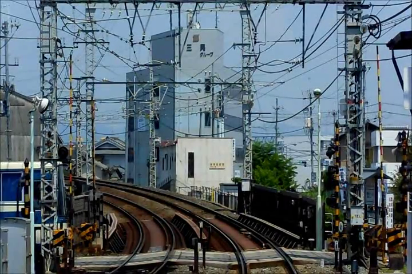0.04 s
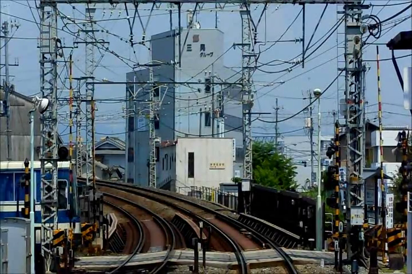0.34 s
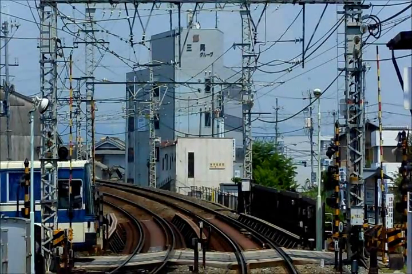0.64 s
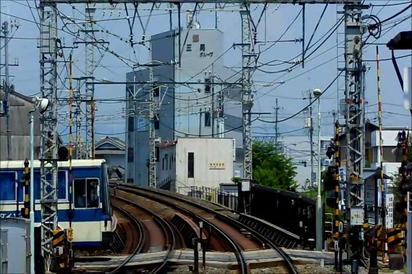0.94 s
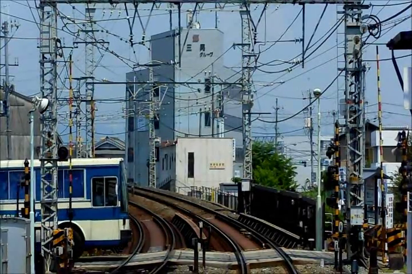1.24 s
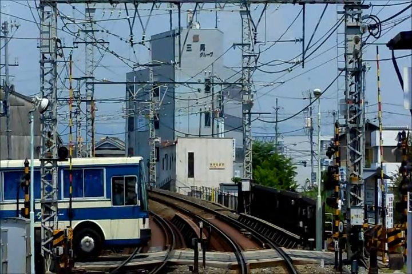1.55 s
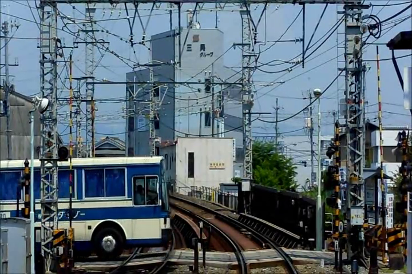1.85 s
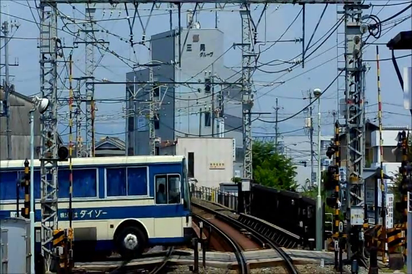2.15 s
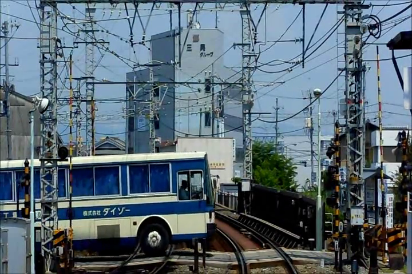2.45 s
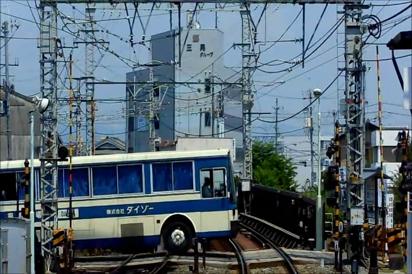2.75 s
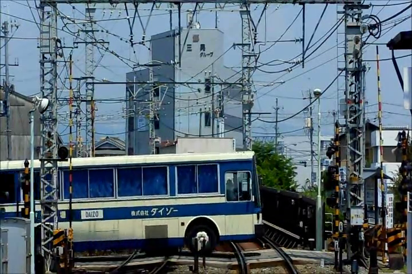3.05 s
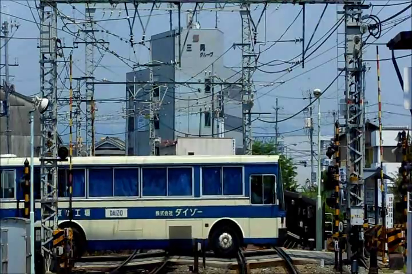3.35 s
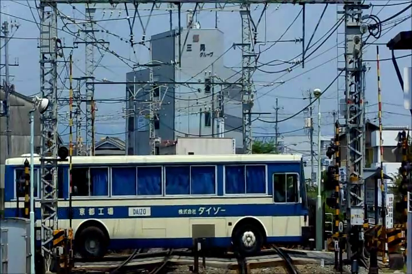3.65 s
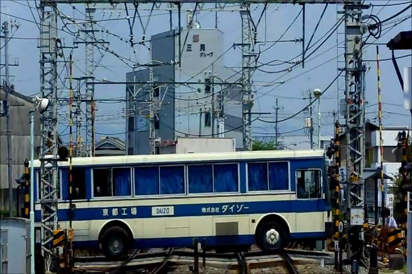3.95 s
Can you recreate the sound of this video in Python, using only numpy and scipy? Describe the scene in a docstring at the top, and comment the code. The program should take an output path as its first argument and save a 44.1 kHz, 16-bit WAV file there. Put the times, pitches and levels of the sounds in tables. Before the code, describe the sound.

A diesel bus throbs, drops at a gear change and revs up again as it rolls over a railway crossing. Engine roar and tyre hiss grow, with faint knocks and groans, heard from down the track over town rumble.

```python
"""Diesel bus on a railway crossing

A bus pulls slowly over the rails in town, heard from down the track. Its exhaust throbs at the
crank and firing rates, falls at a gear change and climbs again. Engine roar and tyre hiss open up
as it comes into the clear, with spells of airy hiss, faint wheel knocks and brief groans.
Behind it lie street wash, rumble, a drone, a hum and a far engine; a few dry ticks sound close by."""
import sys
import numpy as np
from scipy import signal
from scipy.fft import rfft, irfft
from scipy.io import wavfile

SR = 44100
rng = np.random.default_rng(int(sys.argv[2]) if len(sys.argv) > 2 else 0)


def generate_wav(sig):
    """Save sig (samples, or channels by samples) to the path in sys.argv[1] as 16-bit PCM at SR."""
    pcm = np.round(np.clip(np.atleast_2d(sig).T, -1, 1) * 32767).astype(np.int16)
    wavfile.write(sys.argv[1], SR, pcm)


N = 176400
T = np.arange(N) / SR
HZ = np.fft.rfftfreq(N, 1 / SR)


def amp(db):
    """Decibels to gain."""
    return 10 ** (np.asarray(db) / 20)


def curve(points):
    """Straight lines through (s, value) points."""
    return np.interp(T, *np.transpose(points))


def noise(gain):
    """Unit-rms noise shaped by a gain per frequency."""
    x = irfft(rfft(rng.standard_normal(N)) * gain, N)
    return x / np.sqrt(np.mean(x ** 2) + 1e-30)


def coloured(points):
    """Noise with a spectrum of (Hz, relative dB) points."""
    hz, db = np.transpose(points)
    return noise(amp(np.interp(np.log(HZ + 1), np.log(hz + 1), db)))


def band(hz, width_hz):
    """Noise in one resonance."""
    return noise(1 / (1 + ((HZ - hz) / width_hz * 1.12) ** 2))


def wander(rate_hz):
    """Unit-rms random drift up to about rate_hz."""
    return noise(np.exp(-(HZ / rate_hz) ** 2) * (HZ > 0))


def tone(phase_rad):
    """Unit-rms sine with a random start phase."""
    return np.sqrt(2) * np.cos(phase_rad + 2 * np.pi * rng.random())


def unsteady_phase(hz, jitter, rate_hz):
    """Phase in radians; the frequency wanders by the rms fraction jitter."""
    return 2 * np.pi * np.cumsum(hz * (1 + jitter * wander(rate_hz))) / SR


def swell(start_s, length_s, edge_s):
    """Envelope: ease in, hold, ease out."""
    inside_s = np.minimum(T - start_s, start_s + length_s - T)
    return np.sin(np.pi / 2 * np.clip(inside_s / edge_s, 0, 1)) ** 2


def engine_orders(crank_rad, table):
    """Tones at multiples of the crank rate, each wavering in level."""
    waver_db = 3.5
    return sum(amp(db + waver_db * wander(rate_hz=3.5)) * tone(order * crank_rad) for order, db in table)


def exhaust(crank_rad):
    """Throb at the crank rate, firing note at twice that, and weaker orders."""
    # Each row: time in seconds, level in dB.
    throb_db = [(0, -41), (.2, -40.5), (.35, -40), (.43, -50), (.6, -55), (.66, -29.5), (.75, -30),
                (.9, -30), (1.0, -31), (1.08, -29.5), (1.18, -27), (1.32, -33), (1.4, -33), (1.47, -40),
                (1.62, -34.5), (1.85, -39), (2.35, -43.5), (2.65, -37.5), (3.05, -34.5), (3.42, -42.5),
                (3.52, -35), (3.7, -42.5), (3.86, -35), (3.93, -50), (4, -52)]
    # Each row: time in seconds, level in dB.
    firing_db = [(0, -43), (.35, -48), (.6, -49.5), (.72, -42.5), (1.5, -45), (1.7, -42.5), (2.06, -41),
                 (2.2, -48), (2.38, -43), (2.85, -47.5), (3.1, -41), (3.4, -48.5), (3.85, -41.5),
                 (4, -48.5)]
    # Each row: multiple of the crank rate, level in dB re the firing note.
    overtones = [(1.5, -6.5), (3, -17), (4, -25)]
    firing_waver_db, throb_waver_db = 1.5, 0.7
    firing = amp(firing_waver_db * wander(rate_hz=10.7)) * tone(2 * crank_rad)
    firing += engine_orders(crank_rad, overtones)
    throb = amp(throb_waver_db * wander(rate_hz=14.5)) * tone(crank_rad)
    return amp(curve(throb_db)) * throb + amp(curve(firing_db)) * firing


def engine_roar(crank_rad):
    """Noise and growling orders that swell as the bus comes into the open."""
    # Each row: frequency in Hz, relative density in dB.
    spectrum = [(150, -29), (340, 1.5), (520, 0.5), (720, -1.5), (1100, -9), (2000, -11.5), (3700, -13),
                (6000, -24), (15000, -35)]
    # Each row: time in seconds, level in dB.
    level_db = [(0, -59), (2, -61), (2.7, -53.5), (3.3, -51.5), (3.6, -52.5), (4, -52.5)]
    # Each row: multiple of the crank rate, level in dB re the noise.
    growl = [(3.1, -10), (7.5, -13.5), (9, -10), (10.5, -9), (11.5, -14), (14.5, -10)]
    return amp(curve(level_db)) * (coloured(spectrum) + engine_orders(crank_rad, growl))


def tyre_hiss():
    """Hiss of tyres and air under the bus."""
    # Each row: frequency in Hz, relative density in dB.
    spectrum = [(400, -9), (1000, 3), (1600, 2.5), (2400, 1), (3700, -9), (5200, -6.5), (6500, -16.5),
                (10000, -20), (15000, -54)]
    # Each row: time in seconds, level in dB.
    level_db = [(0, -62.5), (1.95, -60), (2.2, -57.5), (2.4, -53.5), (2.85, -54.5), (3.05, -55), (3.6, -57),
                (4, -53.5)]
    return amp(curve(level_db)) * coloured(spectrum)


def sizzle():
    """Thin metallic sizzle that comes and goes."""
    # Each row: time in seconds, level in dB.
    level_db = [(0, -68), (.42, -66), (.62, -66), (1.6, -80), (1.7, -61), (1.86, -81), (2.1, -67.5),
                (3.3, -63), (3.7, -69), (3.96, -62)]
    waver_db = 2
    return amp(curve(level_db) + waver_db * wander(rate_hz=52)) * band(hz=3670, width_hz=420)


def streets():
    """Near-steady street wash over road rumble."""
    # Each row: frequency in Hz, relative density in dB.
    wash_spectrum = [(65, -7), (110, 2), (177, -1), (215, -4), (337, -6), (424, -5.5), (490, -8),
                     (544, -7.5), (698, -12), (790, -11.5), (950, -13.5), (1120, -19.5), (1630, -19),
                     (3050, -26), (3750, -23.5), (4500, -30), (5400, -30.5), (5920, -32), (8600, -32),
                     (9600, -33.5), (12000, -38.5), (15700, -44)]
    # Each row: frequency in Hz, relative density in dB.
    rumble_spectrum = [(8, -14), (20, 18.5), (50, 18.5), (70, -8), (110, -29), (160, 0), (600, -90)]
    wash_db, waver_db, rumble_db = -45, 0.2, -40
    wash = amp(wash_db + waver_db * wander(rate_hz=20)) * coloured(wash_spectrum)
    return wash + amp(rumble_db) * coloured(rumble_spectrum)


def traffic_drone():
    """Low traffic tone, drifting in pitch."""
    # Each row: time in seconds, level in dB.
    level_db = [(0, -47), (.33, -31.5), (.43, -47.5), (.62, -47), (1.15, -46), (1.5, -44), (1.95, -40),
                (2.7, -39), (3.5, -40.5), (3.85, -46), (4, -57)]
    return amp(curve(level_db)) * tone(unsteady_phase(hz=30.3, jitter=0.031, rate_hz=2.1))


def far_engine():
    """A second engine that swells, then fades into the distance."""
    # Each row: time in seconds, level in dB.
    level_db = [(0, -53), (.5, -48), (.8, -43), (1.3, -46.5), (2, -62)]
    return amp(curve(level_db)) * band(hz=89.2, width_hz=13)


def hum():
    """Narrow-band hum that comes and goes."""
    # Each row: time in seconds, level in dB.
    level_db = [(0, -48), (.6, -58.5), (1.25, -56), (1.47, -53.5), (2.3, -58.5), (3.1, -63), (3.55, -61),
                (4, -57.5)]
    return amp(curve(level_db)) * band(hz=282.6, width_hz=11.8)


def ticks():
    """Close dry ticks: fast-decaying modes, slightly smeared by an all-pass."""
    # Each row: start in seconds, peak in dB, treble tilt in dB per octave.
    events = [(0.0845, -36, -2), (0.7955, -24, 8.5), (1.3135, -28, 3), (2.7774, -27, 7.5),
              (3.398, -31.5, 3)]
    # Each row: frequency in Hz, relative level in dB, T60 in seconds.
    tick_modes = [(2540, -0.5, 0.015), (3580, 5.5, 0.004), (4170, 6.5, 0.0032), (6040, -4, 0.0065),
                  (7890, -14, 0.0067), (9350, -24, 0.0056), (12400, -26, .003), (14300, -28, .003)]
    rise_s, highpass_hz, smear_hz, smear_width_hz = 0.0001, 1880, 4760, 1200
    poles = signal.iirpeak(smear_hz, smear_hz / smear_width_hz, SR)[1]
    out, t = np.zeros(N), T[:SR // 100]
    for start_s, peak_db, tilt_db in events:
        ring = np.zeros(len(t))
        for hz, db, t60_s in tick_modes:
            decay = amp(db + tilt_db * np.log2(hz) - 60 * t / t60_s)
            ring += decay * np.cos(2 * np.pi * hz * (t - rise_s / 2))
        ring *= np.minimum(t / rise_s, 1)
        ring = signal.lfilter(poles[::-1], poles, ring)  # all-pass
        ring = signal.lfilter(*signal.butter(2, highpass_hz, "high", fs=SR), ring)
        first = round(start_s * SR)
        out[first:first + len(t)] += amp(peak_db) * ring / abs(ring).max()
    return out


def air_hiss():
    """Short spells of thin, airy hiss."""
    # Each row: start in seconds, length in seconds, centre in Hz, level in dB.
    spells = [(.33, 0.16, 4100, -64.5), (2.294, 0.69, 4660, -65)]
    return sum(amp(db) * swell(start_s, length_s, edge_s=0.085) * band(hz, width_hz=950)
               for start_s, length_s, hz, db in spells)


def rail_knocks():
    """Faint dull knocks as the front wheels cross the rails."""
    # Each row: start in seconds, centre in Hz, level in dB.
    impacts = [(2.635, 1643, -51), (2.868, 1490, -48.5)]
    t60_s = 0.24
    out = np.zeros(N)
    for start_s, hz, db in impacts:
        decay = amp(db - 60 * np.maximum(T - start_s, 0) / t60_s)
        out += decay * swell(start_s, length_s=1, edge_s=0.0048) * band(hz, width_hz=830)
    return out


def groans():
    """Brief unsteady tones as the bus labours over the rails."""
    # Each row: start in seconds, length in seconds, pitch in Hz, level in dB.
    events = [(2.66, 0.093, 355.5, -53), (2.77, 0.22, 545, -57.5), (3.12, 0.18, 362, -50.5),
              (3.2, 0.14, 403, -55), (3.348, 0.254, 360, -56.5), (3.6, 0.14, 695, -59),
              (3.714, 0.13, 284, -48.5), (3.774, 0.17, 545, -55)]
    out = np.zeros(N)
    for start_s, length_s, hz, db in events:
        phase_rad = unsteady_phase(hz, jitter=0.006, rate_hz=19)
        out += amp(db) * swell(start_s, length_s, edge_s=0.041) * tone(phase_rad)
    return out


def scene():
    """Bus, town and ticks in mono; one crank drives exhaust, growl and pulsing."""
    # Each row: time in seconds, crank speed in turns per second.
    speed_hz = [(0, 43), (.2, 52), (.4, 51.4), (.6, 28.5), (.68, 30), (.85, 28.8), (1.14, 31.5), (1.32, 36),
                (1.7, 40.6), (1.97, 45.3), (2.42, 46), (2.75, 47.6), (3.01, 47.6), (3.31, 41.7), (3.71, 48),
                (4, 52)]
    crank_rad = unsteady_phase(curve(speed_hz), jitter=0.0195, rate_hz=16.35)
    pulse_depth, jolt_db = 0.1, 0.53
    firing_pulse = 1 + pulse_depth * np.cos(2 * crank_rad)
    bus = exhaust(crank_rad)
    roar_and_hiss = engine_roar(crank_rad) + tyre_hiss()
    bus += sizzle()
    jolts = amp(jolt_db * wander(rate_hz=28))  # bumpy crossing
    bus += firing_pulse * jolts * roar_and_hiss
    bus += groans() + rail_knocks() + air_hiss()
    town = streets() + traffic_drone() + far_engine() + hum()
    return (bus + town + ticks())[None]


def record(dry):
    """Adds a faint high whine, then a steep low-pass."""
    whine_hz, whine_db, cutoff_hz = 15734, -88, 15850
    whine = amp(whine_db) * np.sqrt(2) * np.sin(2 * np.pi * whine_hz * T)
    lowpass = signal.firwin(511, cutoff_hz, window=("kaiser", 9), fs=SR)
    return signal.oaconvolve(dry + whine, lowpass[None], "same")


dry = scene()
out = record(dry)
generate_wav(out)
```